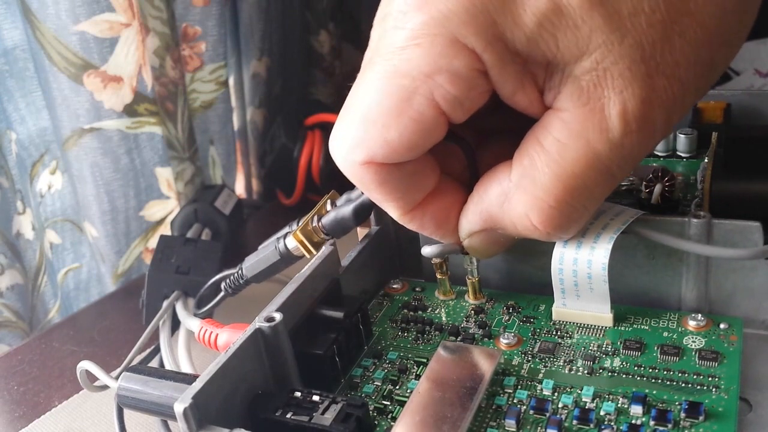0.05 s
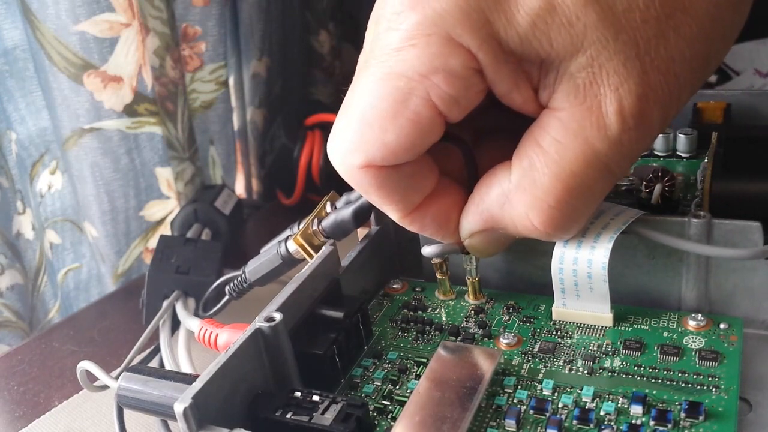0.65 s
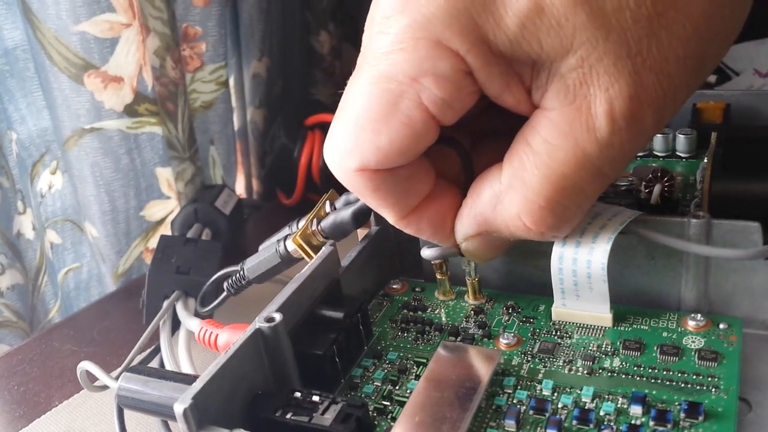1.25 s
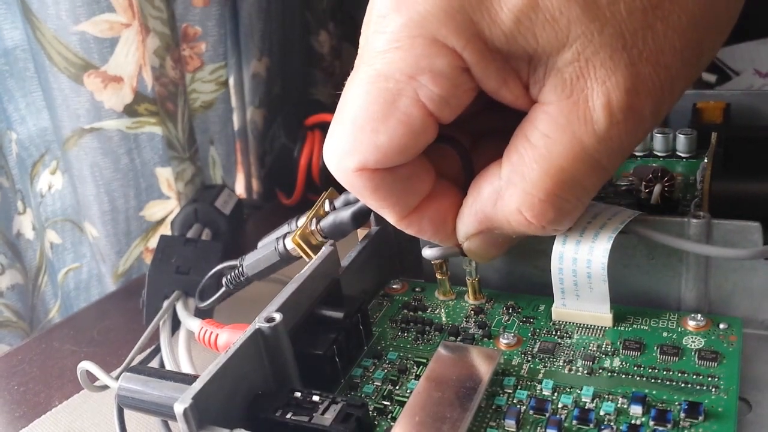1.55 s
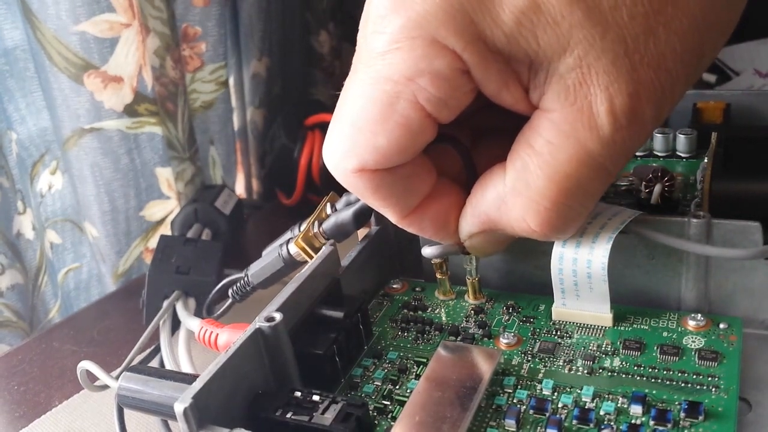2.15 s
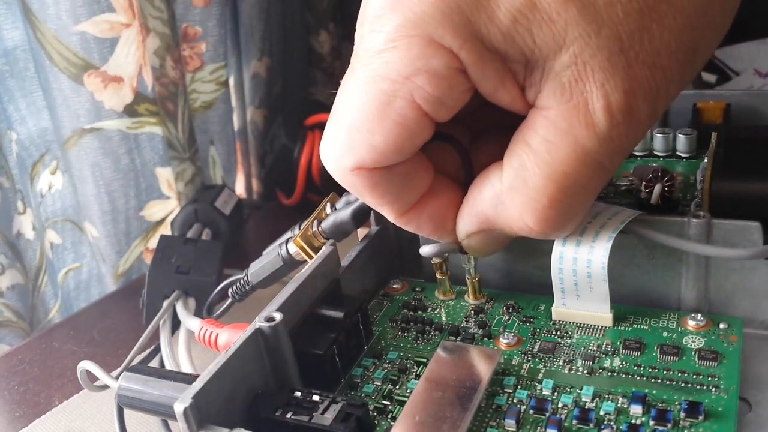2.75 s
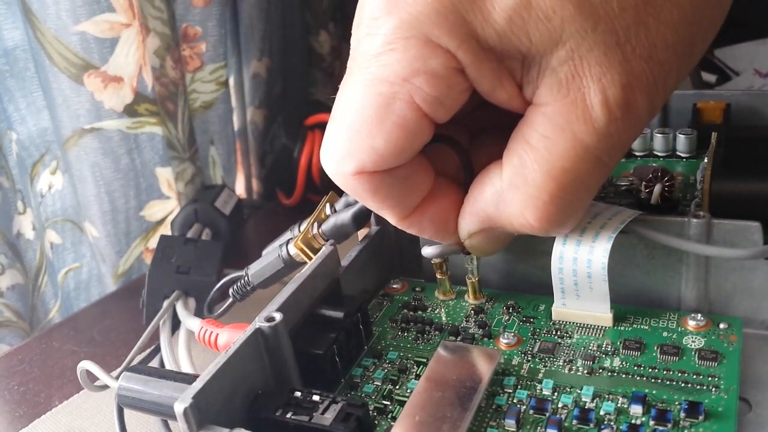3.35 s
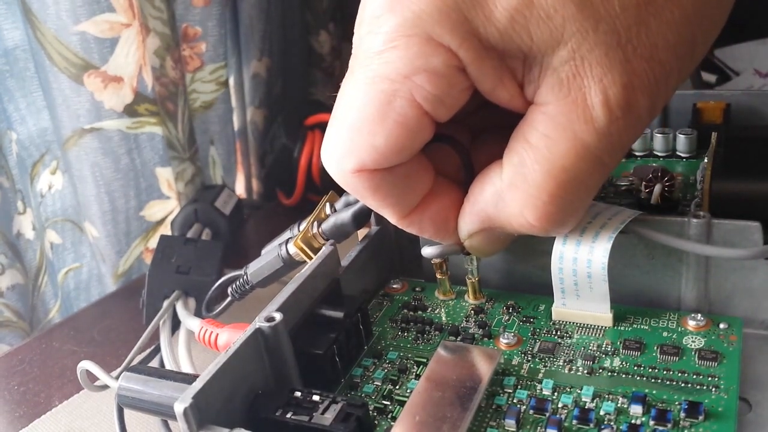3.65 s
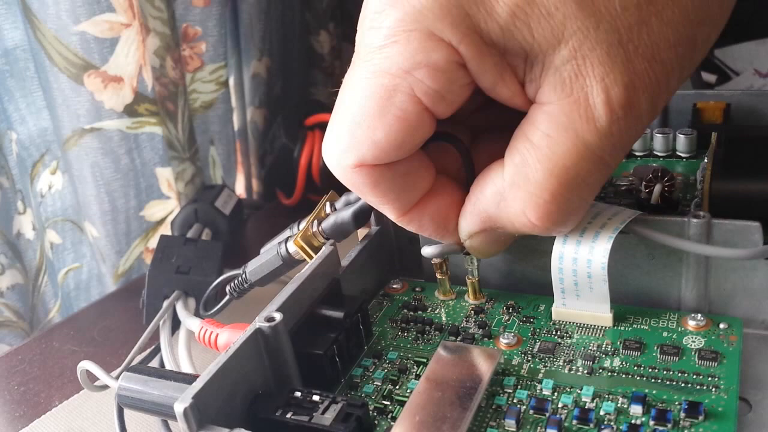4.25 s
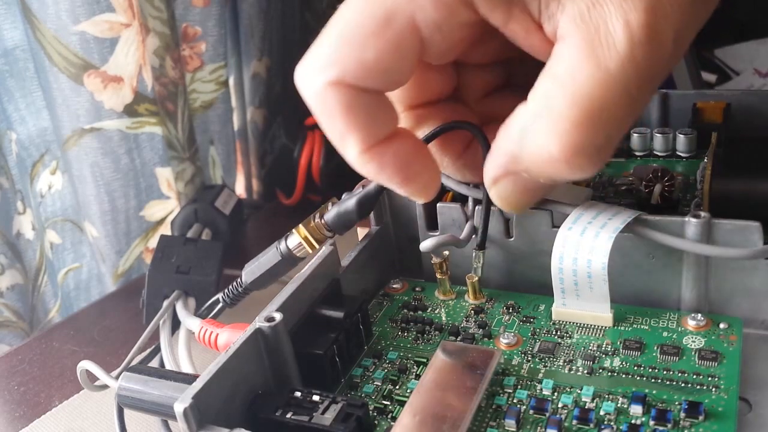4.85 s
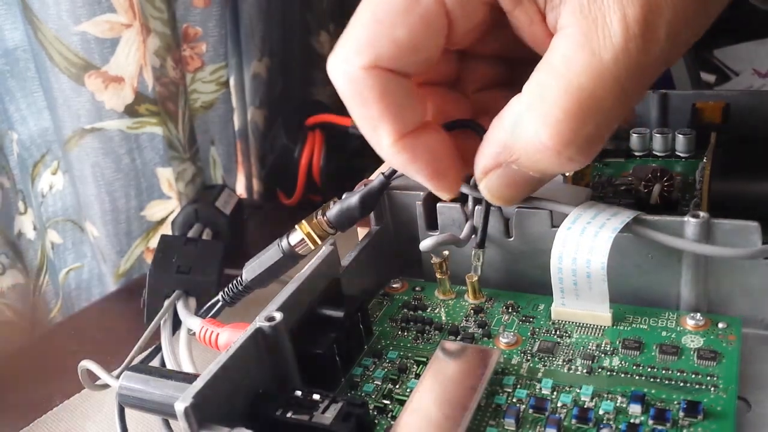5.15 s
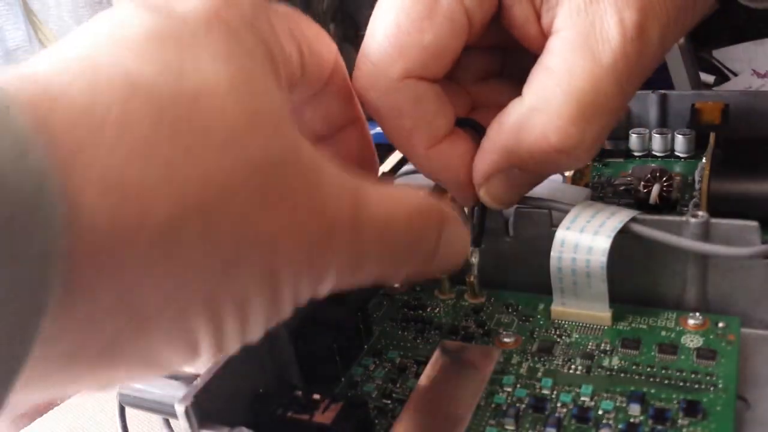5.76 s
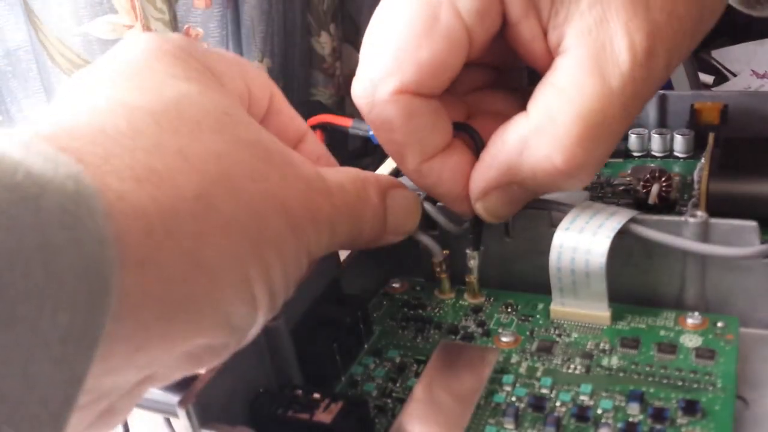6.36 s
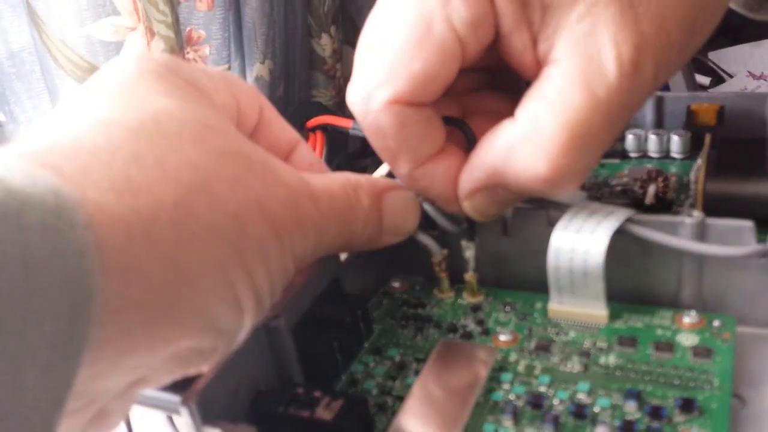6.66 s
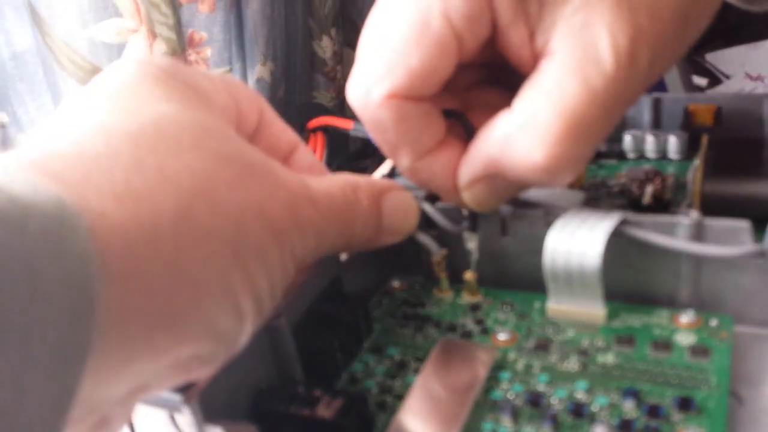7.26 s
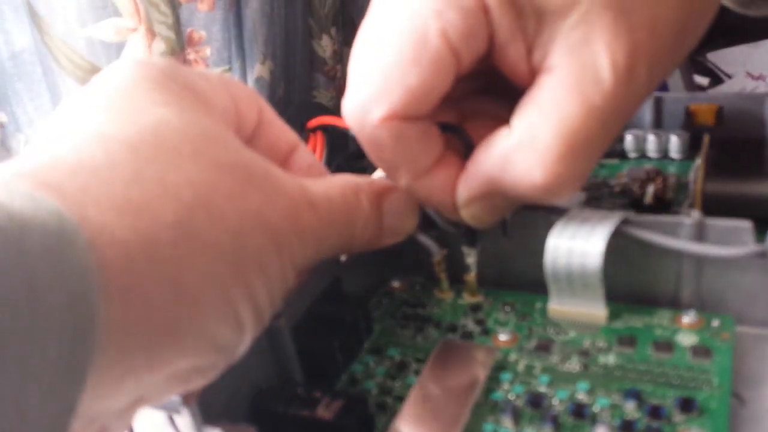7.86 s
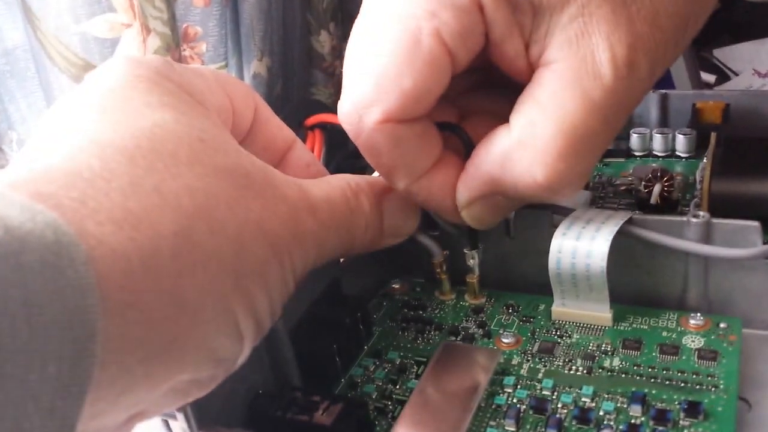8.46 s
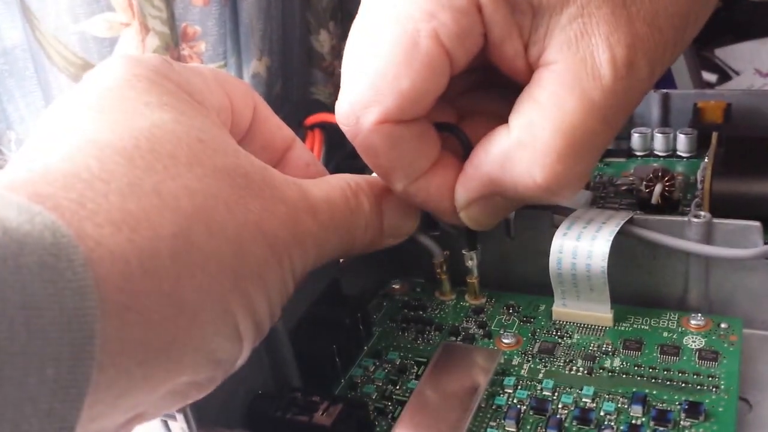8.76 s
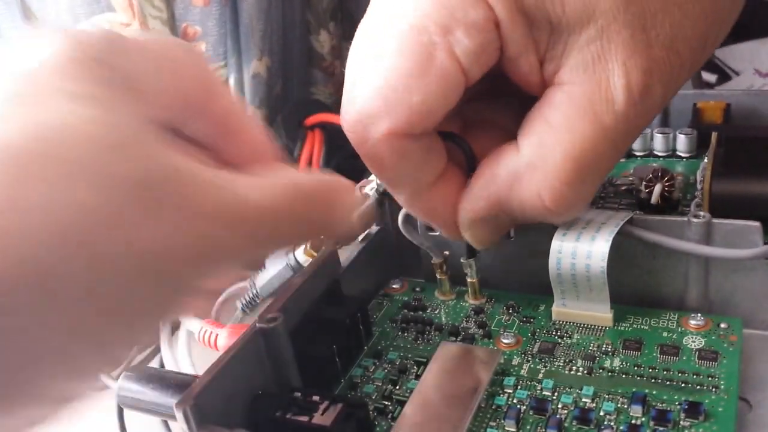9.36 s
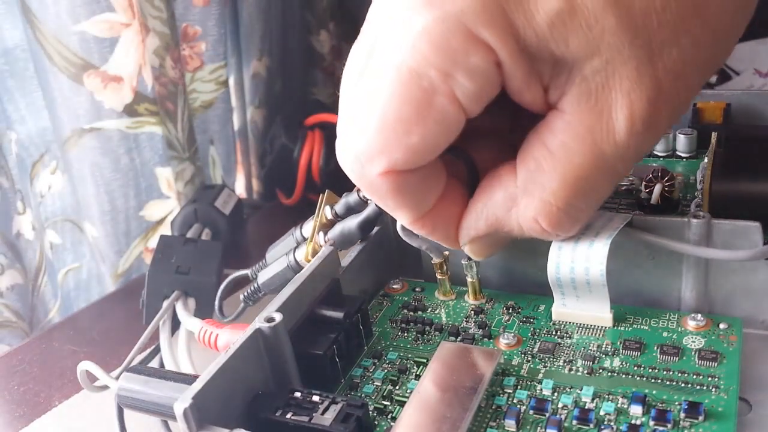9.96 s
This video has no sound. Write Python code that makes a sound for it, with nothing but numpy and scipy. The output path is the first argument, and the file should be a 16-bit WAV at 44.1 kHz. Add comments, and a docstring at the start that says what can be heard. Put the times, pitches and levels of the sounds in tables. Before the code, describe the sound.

Close up in a quiet room, fingers work a small metal plug into a tight jack on a circuit board. Light ticks and clicks come first, each briefly ringing the board and chassis. The plug slips sharply three times, with soft hand bumps and skin rubbing the cable in between. A tiny creak follows, then a cluster of knocks with a low boom from the bench. A faint electronic whine drops out twice.

```python
"""Close up in a quiet room, fingers work a small metal plug into a tight jack on a circuit board.
It opens on light ticks and clicks, each ringing board and chassis, over the powered unit's faint whine,
which drops out twice. The plug slips hard at 3.4, 4.8 and 6.8 s, the hand bumping the chassis and skin
rubbing the cable in between. A soft creak follows at 7.7 s. From 9.1 s the plug knocks against
board and chassis, and the bench booms underneath."""
import sys
import numpy as np
from scipy import signal
from scipy.fft import rfft, irfft, next_fast_len
from scipy.io import wavfile
from scipy.ndimage import uniform_filter1d

SR = 44100
rng = np.random.default_rng(int(sys.argv[2]) if len(sys.argv) > 2 else 0)


def file_out(sig):
    """Save sig as 16-bit WAV at sys.argv[1]."""
    # one column per channel
    cols = np.atleast_2d(sig).T
    # limit, then scale
    lim = np.clip(cols, -1, 1)
    pcm = np.round(lim * 32767).astype(np.int16)
    wavfile.write(sys.argv[1], SR, pcm)


N = 440991
TIME = np.arange(N) / SR

# The plug catches and slips. Depth is how far the blow drives into the board, hardness the bite of the
# edge, ping the jack's own ring; the spot it hits lifts one favoured resonance.
# t/s, level/dB, depth/dB, hardness/dB, ping/dB, favoured f/Hz, lift/dB, contact t60/s, pan left/dB
PLUG_SLIPS = [(0.2755, -16.5, 23, 6, -2, 2100, 9, 0.024, -4.5),
              (1.5519, -3, 21.5, 9, -12, 875, 10, 0.06, 0.5), (1.717, -10.5, 15, 9, -11, 4700, 8, 0.013, 3),
              (1.7515, -4.5, 2, -9, -18, 2180, 10, 0.0039, 3.5),
              (2.7326, -5, 2, -1, 6.5, 1410, 7, .008, 1.5), (3.321, -13, 23, 16, 7.5, 2070, 3, 0.018, -1),
              (3.3578, 15, -1.5, 2.5, -4, 10160, 16, 0.0057, 0),
              (3.3598, 11.5, -7, 2, 7.5, 5400, 11, 0.013, -2), (3.664, -18, 11, 1, 3, 2210, 5, .009, 0),
              (4.1157, -7, 18, 12, 5, 6800, 13, 0.015, -0.5), (4.5969, 1, 9.5, -14, 0, 4400, 0, 0.013, 1.5),
              (4.6388, 0, -14.5, 6, -5, 1110, 18, .0074, 2.5),
              (4.8344, 4.5, -2, 17, 5, 3880, 17, 0.0047, -4),
              (4.8354, 17.5, 0.5, 10, -5, 1180, 9, 0.011, -2),
              (4.896, 8.5, 0, 12.5, -14, 3220, 12.5, .013, 0.5),
              (5.623, -13.5, 22, 3, -8, 900, 10, 0.081, 1.5),
              (6.8284, 27, -8, 0, -9, 1354, 14.5, .0105, -0.5),
              (6.832, 17.5, 1.5, -1, -15.5, 2450, 11.5, 0.03, -1),
              (8.71, 9.5, 14, 2, 0, 3270, 7, 0.012, -3.5)]
# The plug knocks on board and chassis:
# t/s, level/dB, depth/dB, hardness/dB, favoured f/Hz, lift/dB, contact t60/s
PLUG_KNOCKS = [(9.1378, 18.5, -3.5, 3, 4880, 4, 0.0063), (9.4515, 13.5, -2.5, -1, 1130, 2, 0.01),
               (9.689, 1.5, 4.5, -1, 1350, 2, 0.023), (9.695, -3, 3, -4, 4350, 12, 0.022),
               (9.7078, 11.5, 2, -4.5, 3480, 2.5, 0.014), (9.7453, -4, -2, 2, 4760, 13, 0.017),
               (9.755, 6, 6, -4, 1180, 5, 0.022)]
# Light ticks of cable and fingernail: t/s, level/dB, depth/dB, favoured f/Hz
LIGHT_TICKS = [(0.102, -34.5, 19.5, 1930), (0.1336, -22.5, 2, 2170), (2.756, -30, 7, 1530),
               (4.708, -19, 16.5, 3000), (5.832, -27.5, 14, 2050), (6.107, -23.5, -4, 8170),
               (6.38, -26, 8, 1900), (6.603, -24, 13.5, 3100), (0.182, -26, 12.5, 4700),
               (0.485, -28, 18, 4750), (0.6073, -33, 17, 4750), (0.9728, -24.5, -14, 6460),
               (1.065, -11.5, -11, 5700), (1.087, -12, -2.5, 5900), (1.1536, -30, 15, 4830),
               (2.874, -26.5, 21, 2700), (2.8918, -16.5, 2, 6700), (3.179, -27, -1, 6640),
               (5.7137, -15.5, 4.5, 5300), (6.632, -18.5, 7.5, 3080), (6.764, -4, -7.5, 5830),
               (6.8057, -4, -14.5, 7500), (6.862, -3, 2, 5940), (6.9375, -18, 11.5, 3200),
               (7.0, -16.5, 6.5, 5940), (7.1112, -21, 12, 3100), (7.1622, -3, -2.5, 4970),
               (7.197, -16, -4, 6200), (7.214, -12, 8, 5940), (7.26, -22, 9, 3050),
               (7.6003, -3.5, -8, 6110), (7.985, -15.5, -6, 6060), (9.545, -11.5, -33, 8600),
               (9.563, -17, -11, 8550), (9.6182, -23, 5, 4870), (9.6605, -9.5, -23, 10050),
               (9.671, -9, -14, 10050)]
# Tone of the force behind a slip, a knock and a tick: f/Hz, level/dB
SLIP_EQ = [(250, -16), (800, -18), (1300, -12), (1900, -6.5), (4400, -4.5), (7800, 0.5), (12500, -4)]
KNOCK_EQ = [(250, 2), (900, 2.5), (1400, 2), (1900, 1), (2800, -3), (4400, 1.5), (7800, 0)]
TICK_EQ = [(250, 3), (900, -7), (1400, -5.5), (2000, -3.5), (4400, 0.5), (7800, 0), (12500, -1)]
# A deeper blow gains body, a harder edge gains top: f/Hz, share of the depth or hardness
DEPTH_CURVE = [(250, .6), (900, 1), (1900, 0.61), (4400, 0.62), (7800, 0), (12500, -.05)]
HARDNESS_CURVE = [(7800, 0), (12500, 1)]
# Resonances of board, chassis and plug: f/Hz, width/Hz, left level/dB, right level/dB
CHASSIS_MODES = [(111.7, 28, -17.5, -12.5), (210, 170, -14, -16), (477, 71, -14, -18),
                 (761, 20, -3.5, -5.5), (1524, 27, -11.5, -5), (866, 100, -7.5, -11),
                 (1297, 230, -10, -8.5), (1822, 95, -2, -4), (2090, 180, -10.5, -12),
                 (2456, 107, -12, -11.5), (2830, 170, -15, -19), (3580, 470, -19.5, -11.5),
                 (4170, 100, -11.5, -28.5), (4815, 160, -8.5, -18), (5260, 500, -11.5, -12.5),
                 (6290, 185.3, -9.5, -8), (6710, 240, -12.5, -5.5), (7090, 80, -24, -5.5),
                 (7648, 40, -14, -0.5), (7660, 200, -17.5, -6.5), (8160, 350, -28, -4),
                 (8910, 190, -21.5, -10), (9780, 330, -20.5, -15.5), (10350, 96, -20, -15),
                 (11260, 440, -24.5, -19.5), (12850, 1086, -25.5, -23.5), (14400, 1815, -30, -30.5)]
# Finger strokes along the cable: peak t/s, rise/s, fall/s, swish level/dB, hand weight level/dB
FINGER_STROKES = [(1.79, 0.15, 0.057, -78, -69), (4.58, 0.11, 0.072, -70, -78),
                  (4.8, 0.17, 0.13, -58.5, -58), (4.872, 0.014, 0.025, -49, -69),
                  (4.903, 0.024, 0.018, -45.5, -47), (5.3, 0.26, 0.19, -66, -66.5),
                  (5.68, 0.3, 0.24, -68, -71), (6.32, .07, 0.021, -64, -72),
                  (6.47, .07, 0.058, -66.5, -62.5), (6.69, 0.24, 0.41, -66.5, -61.5),
                  (6.807, .005, .007, -51, -72.5), (6.89, .08, 0.079, -59.5, -62),
                  (7.21, 0.08, 0.082, -65, -67), (9.4, 0.063, 0.046, -66, -77),
                  (9.78, 0.099, 0.15, -63, -61)]
# Tone of skin sliding, of skin dragging and of the hand's weight on the chassis: f/Hz, level/dB
SWISH_EQ = [(240, -33.5), (400, -6.5), (994, -5), (1510, -10.5), (3750, -5.5), (4050, -5.5), (4440, -5.5),
            (5030, -3), (8370, -1.5), (14400, -16.5), (16000, -24.5)]
SCRAPE_EQ = [(300, -24.5), (800, -3.5), (1300, -3), (2000, -0.5), (3200, -2.5), (5200, -5), (9000, -22.5),
             (16000, -39)]
RUMBLE_EQ = [(30, -21), (55, -13), (85, -0.5), (140, -3), (250, -1), (400, -12.5), (700, -19), (1500, -41)]
# The hand bumps the chassis: t/s, level/dB, f/Hz, t60/s
HAND_BUMPS = [(2.875, -55.5, 300, 0.11), (4.397, -47, 157, 0.094), (4.661, -50.5, 257, 0.096),
              (4.771, -49, 106, 0.14), (4.897, -52.5, 172, .09)]
# Spells of electronic whine: start t/s, end t/s, starting sharpness of the fundamental/Hz
WHINE_TIMES = [(0, 1.9, 3), (3.151, 3.4, 13), (5.12, 10, 8.5)]
# Overtones of the whine: harmonic number, level/dB
WHINE_HARMONICS = [(9, -82.5), (10, -78.5), (11, -80), (12, -88), (13, -89), (14, -89), (15, -92),
                   (16, -90), (17, -88), (18, -93)]
# Decay of the nearby reflections and of the late tail: f/Hz, t60/s
NEAR_DECAY = [(150, .22), (800, .17), (2500, .14), (8000, .14), (15000, .11)]
LATE_DECAY = [(150, 0.4), (800, 0.34), (2500, .42), (8000, 0.32), (15000, 0.249)]
# Tone of the reflections: f/Hz, level/dB
REVERB_EQ = [(120, -0.5), (400, 5.5), (1000, 0), (2400, 3.5), (3800, 4), (6000, 0), (8000, 0), (11000, 4.5),
             (14000, -9.5)]
# Room tone and microphone hiss: f/Hz, level/dB
ROOM_TONE_EQ = [(20, -11), (33, -10.5), (48, -11.5), (80, -5.5), (180, -9), (270, -7), (350, -14),
                (450, -19), (900, -25.5), (2800, -28.5), (7000, -27), (10000, -29), (15000, -28),
                (16000, -32)]
# How alike the two microphone ports hear: f/Hz, correlation
STEREO_LIKENESS = [(60, .88), (290, .85), (640, 0.22), (1400, 0.031), (16000, 0)]


def clicks(size=8192, rise_s=.0006, snap=2.1, gain_db=1.3, ping_hz=1853, ping_width_hz=140):
    """Each contact's snap and brief chatter ring the chassis. Returns direct sound and reverb send."""
    hz, t = np.fft.rfftfreq(size, 1 / SR), np.arange(size) / SR
    direct, send = np.zeros((2, 2, N))
    modes = chassis(hz)
    body = causal(modes)
    # summed over all directions, the peaks and dips even out
    diffuse_body = causal(np.sqrt(uniform_filter1d(modes ** 2, size=120, axis=1).clip(0)))
    fade = np.clip(3 - 4 * t / t[-1], 0, 1)
    lead_s, margin_s = .0003, .002
    for eq, s, db, depth_db, hard_db, ping_db, ring_hz, lift_db, t60, pan_db in contacts():
        chatter = rng.standard_normal((2, size)) * (1 - np.exp(-t / rise_s))
        chatter *= amp(-60 * t / max(t60, .002))
        chatter[:, round(rise_s * SR)] += snap
        force = paired(rfft(np.roll(chatter, round(margin_s * SR), axis=1)), hz)
        power = uniform_filter1d(abs(force) ** 2, size=85, axis=1)
        force /= np.sqrt(uniform_filter1d(power, size=85, axis=1))  # flatten the chatter's own tone
        force_db = db + read(eq, hz) + depth_db * read(DEPTH_CURVE, hz)
        force *= causal(amp(force_db + hard_db * read(HARDNESS_CURVE, hz)))
        # the spot that is hit decides which resonances speak
        spot_db = lift_db * bell_curve(hz, ring_hz, width_hz=0.059 * ring_hz + 80)
        spot_db += ping_db * bell_curve(hz, ping_hz, ping_width_hz)
        start = s - lead_s - margin_s
        pan = amp([[pan_db / 2], [-pan_db / 2]])
        add(direct, start, irfft(force * body * causal(amp(spot_db))) * fade * pan)
        add(send, start, irfft(force * diffuse_body * causal(amp(.6 * spot_db))) * fade)
    return amp(gain_db) * direct, amp(gain_db) * send


def contacts(grit_count=55, grit_within_s=0.075, grit_db=-33, grit_depth_db=8.5):
    """Cue list of slips, knocks, ticks and faint catches: an EQ, then the columns of PLUG_SLIPS."""
    anchors = [row[0] for row in PLUG_SLIPS + LIGHT_TICKS]
    grit = []
    for which, when, force, spot in rng.random((grit_count, 4)):
        s = abs(anchors[int(which * len(anchors))] + grit_within_s * (2 * when - 1))
        grit.append((s, grit_db - (2 * force - 1), grit_depth_db, np.interp(spot, [0, 1], [2000, 7000])))
    knock_ping_db, knock_pan_db = -3.5, -1.3
    tick_ping_db, tick_lift_db, tick_t60_s = -6, 10, 0.015
    slips = [(SLIP_EQ, *row) for row in PLUG_SLIPS]
    knocks = [(KNOCK_EQ, s, db, depth, hard, knock_ping_db, hz, lift, t60, knock_pan_db)
              for s, db, depth, hard, hz, lift, t60 in PLUG_KNOCKS]
    ticks = [(TICK_EQ, s, db, depth, 0, tick_ping_db, hz, tick_lift_db, tick_t60_s, 0)
             for s, db, depth, hz in LIGHT_TICKS + grit]
    return slips + knocks + ticks


def chassis(hz, skirt=2.2):
    """Left and right gain of the ringing metal and board: steep-sided resonances summed in power."""
    centre, width, left_db, right_db = np.transpose(CHASSIS_MODES)
    detune = (hz[:, None] - centre) / width
    power = 1 / (1 + (2 * detune) ** 2) / (1 + (detune / skirt) ** 2)
    return np.sqrt(amp([left_db, right_db]) ** 2 @ power.T)


def rubbing(catches_per_s=400, catch_decay_s=.0012, uneven_db=0.5):
    """Skin slides over the cable: a soft swish with tiny catches in it."""
    catches = (rng.random(N) < catches_per_s / SR) * np.minimum(rng.exponential(.4, N), 1)
    spurts = signal.lfilter([1], [1, -np.exp(-1 / (catch_decay_s * SR))], catches)
    friction = rng.standard_normal((2, N)) * (1 + spurts)
    swell = stroke_envelope([row[3] for row in FINGER_STROKES]) * amp(uneven_db * drift(32))
    return coloured(friction, SWISH_EQ) * swell * amp([[1.5], [2.5]])


def scraping(db=-9.0, uneven_db=5.5, grip_hz=35):
    """The skin grips and lets go during each stroke, in short uneven scrapes."""
    grip = amp(db + uneven_db * np.minimum(drift(grip_hz), 2))
    return noise(SCRAPE_EQ) * stroke_envelope([row[3] for row in FINGER_STROKES]) * grip


def stroke_envelope(peaks_db, shape=1.03):
    """Each finger stroke swells to its peak and falls away; shape 1 is pointed, 2 rounded."""
    power = np.zeros(N)
    for (s, rise_s, fall_s, *_), db in zip(FINGER_STROKES, peaks_db):
        span = slice(max(round((s - 6 * rise_s) * SR), 0), round((s + 6 * fall_s) * SR))
        from_peak = np.maximum((s - TIME[span]) / rise_s, (TIME[span] - s) / fall_s)
        power[span] += (amp(db) * np.exp(-from_peak ** shape)) ** 2
    return np.sqrt(power)


def rumble(tremor_db=2.0, boom_db=-61.5, boom_share=0.56):
    """The hand's tremor rumbles in the chassis; a share of each knock's strength booms in the bench."""
    weight = stroke_envelope([row[4] for row in FINGER_STROKES]) * amp(tremor_db * drift(11))
    boom = sum(amp(boom_share * db + boom_db) * struck(s, rise_s=.004, t60=0.44)
               for s, db, *_ in PLUG_KNOCKS)
    return noise(RUMBLE_EQ) * np.hypot(weight, boom)


def hand_bumps(rise_s=0.0011, shudder_db=-7.0, shudder_t60_s=0.26):
    """The soft side of the hand meets the chassis: a short low thump with a shudder for a tail."""
    thump = sum(amp(db) * struck(s, rise_s, t60) * np.sin(2 * np.pi * hz * (TIME - s))
                for s, db, hz, t60 in HAND_BUMPS)
    shudder = sum(amp(db + shudder_db) * struck(s, rise_s, shudder_t60_s) for s, db, *_ in HAND_BUMPS)
    return thump + shudder * noise(RUMBLE_EQ)


def creak(at_s=7.69, length_s=.036, start_hz=600, end_hz=225, db=-57.0, roughness=0.3):
    """One soft creak: a ragged tone that dives in pitch."""
    t, out = np.arange(0, length_s, 1 / SR), np.zeros((2, N))
    glide = start_hz * (end_hz / start_hz) ** (t / length_s)
    pitch = glide * (1 + roughness * drift(380)[:len(t)])
    phase = 2 * np.pi * np.cumsum(pitch) / SR
    envelope = signal.windows.tukey(len(t), .2) * np.sqrt(1 - (t / length_s) ** 2)
    tone = (np.sin(phase) + .3 * np.sin(2 * phase)) * envelope
    add(out, at_s, amp(db) * np.array([tone, tone]))
    return out


def whine(fundamental_hz=822.8, settle_s=2.8, waver_hz=1.2, fade_s=0.02):
    """The electronics sing in high harmonics, off to the right: each spell starts sharp and settles."""
    out = np.zeros((2, N))
    pan = amp([[-8], [-1.5]])
    for start, end, sharp_hz in WHINE_TIMES:
        t = np.arange(0, min(end - start, N / SR - .001), 1 / SR)
        pitch = fundamental_hz + sharp_hz * np.exp(-t / settle_s) + waver_hz * drift(73)[:len(t)]
        phase = 2 * np.pi * np.cumsum(pitch) / SR
        tone = sum(amp(db) * np.sin(round(k) * phase) for k, db in WHINE_HARMONICS)
        gate = np.clip(np.minimum(t, t[-1] - t) / fade_s, 0, 1)
        add(out, start, np.sqrt(2) * tone * gate * pan)
    return out


def hiss(db=-78.0, fade_s=.06):
    """A faint hiss comes and goes with the whine."""
    gate = sum(np.clip(np.minimum(TIME - start, end - TIME) / fade_s, 0, 1)
               for start, end, _ in WHINE_TIMES)
    return amp(db) * gate * noise(SWISH_EQ)


def reflections(send, decay, predelay_s, size=26000):
    """Bench and room return a diffuse tail whose bands die at their own speeds."""
    hz, t, bands = signal.stft(rng.standard_normal((2, size)), SR, nperseg=256)
    envelope = amp(-60 * t / read(decay, hz)[:, None] + read(REVERB_EQ, hz)[:, None])
    tail = signal.istft(bands * envelope, SR, nperseg=256)[1]
    tail = np.pad(tail / np.linalg.norm(tail[0]), ((0, 0), (round(predelay_s * SR), 0)))
    return signal.oaconvolve(send, tail, axes=1)[:, :N]


def room_tone(db=-68.1):
    """The bed: a steady low murmur of the room under the microphone's hiss."""
    return noise(ROOM_TONE_EQ) * amp(db)


def amp(db):
    """Decibels to gain."""
    return 10 ** (np.asarray(db) / 20)


def unit_rms(x):
    """Scales to rms 1."""
    return x / np.sqrt(np.mean(x ** 2) + 1e-20)


def read(curve, hz):
    """Reads a curve along a log-frequency axis."""
    f, value = np.transpose(curve)
    return np.interp(np.log(hz + 1), np.log(f + 1), value)


def bell_curve(hz, centre_hz, width_hz):
    """A resonant hump of height 1."""
    return 1 / (1 + ((hz - centre_hz) / width_hz) ** 2)


def add(mix, s, sound):
    """Mixes a stereo sound in at time s."""
    part = mix[:, max(round(s * SR), 0):][:, :sound.shape[1]]
    part += sound[:, :part.shape[1]]


def struck(s, rise_s, t60):
    """Envelope of a hit at time s: fast attack, steady decay."""
    t = np.clip(TIME - s, 0, 3 * t60)
    return (1 - np.exp(-t / rise_s)) * amp(-60 * t / t60)


def drift(rate_hz):
    """Smooth random modulation of rms 1."""
    hz = np.fft.rfftfreq(N, 1 / SR)
    return unit_rms(irfft(rfft(rng.standard_normal(N)) * np.exp(-(hz / rate_hz) ** 2), N))


def paired(spectra, hz):
    """Stereo image: the two microphone ports share their bass and differ in the treble."""
    left, right = spectra
    shared = np.clip(read(STEREO_LIKENESS, hz), 0, 1)
    return np.array([shared * right + np.sqrt(1 - shared ** 2) * left, right])


def coloured(x, eq):
    """Gives stereo noise its image and an EQ curve, at rms 1."""
    size = next_fast_len(N)
    hz = np.fft.rfftfreq(size, 1 / SR)
    spectra = paired(rfft(x, size), hz) * amp(read(eq, hz))
    return unit_rms(irfft(spectra, size)[:, :N])


def noise(eq):
    """Steady stereo noise through an EQ curve, at rms 1."""
    return coloured(rng.standard_normal((2, N)), eq)


def causal(gain):
    """Minimum-phase response: it rings only after the hit."""
    cepstrum = irfft(np.log(np.maximum(gain, 1e-5)))
    half = cepstrum.shape[-1] // 2
    cepstrum[..., 1:half] *= 2
    cepstrum[..., half + 1:] = 0
    return np.exp(rfft(cepstrum))


def scene(near_db=-17, late_db=-28.0, crossfeed=0.11):
    """The mix: clicks and their reverb up front, dry handling beneath, whine and room tone behind."""
    direct, send = clicks()
    send = (1 - crossfeed) * send + crossfeed * send[::-1]  # reflections reach both ports
    near = amp(near_db) * reflections(send, NEAR_DECAY, predelay_s=.003)
    late = amp(late_db) * reflections(send, LATE_DECAY, predelay_s=.012)
    handling = creak() + rubbing() + scraping() + rumble() + hand_bumps()
    return direct + near + late + handling + whine() + hiss() + room_tone()


def record(dry, cutoff_hz=15900):
    """A steep low-pass takes off the very top."""
    lowpass = signal.firwin(255, cutoff_hz, window=("kaiser", 9), fs=SR)
    return signal.oaconvolve(dry, lowpass[None], "same", axes=1)


dry = scene()
out = record(dry)
file_out(out)
```